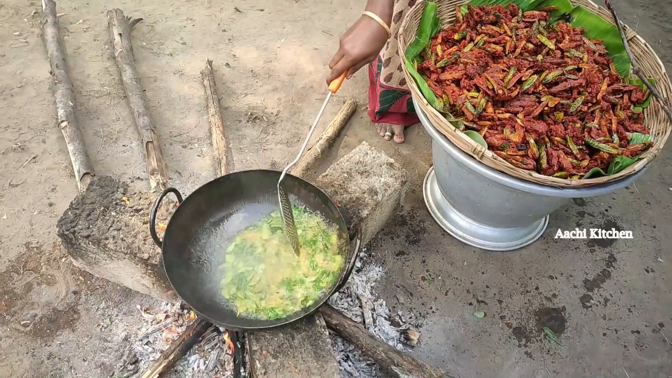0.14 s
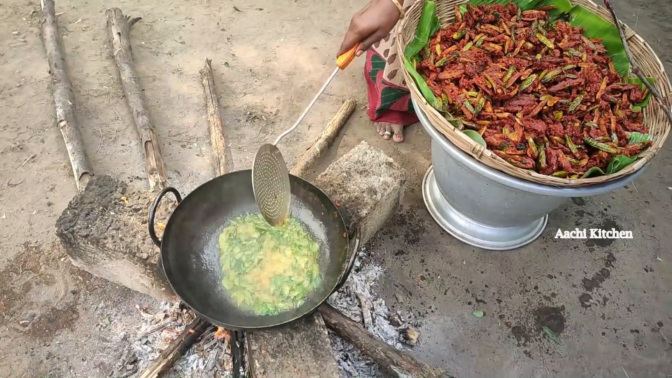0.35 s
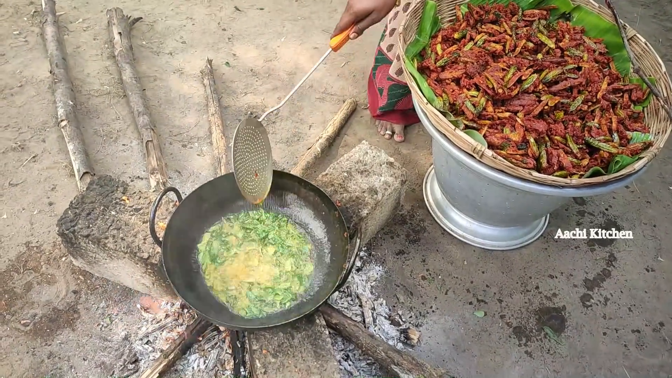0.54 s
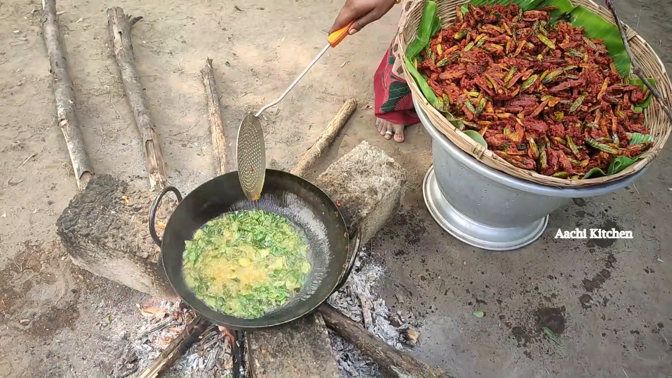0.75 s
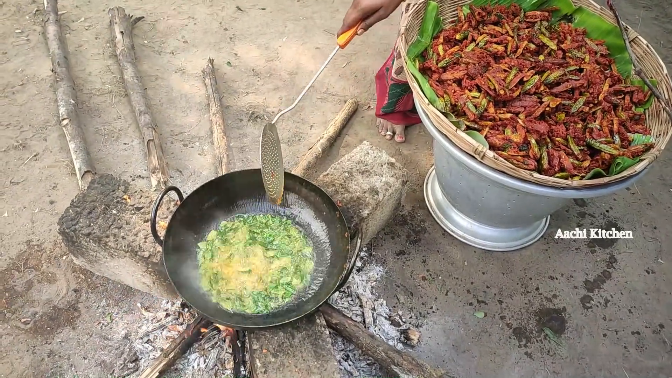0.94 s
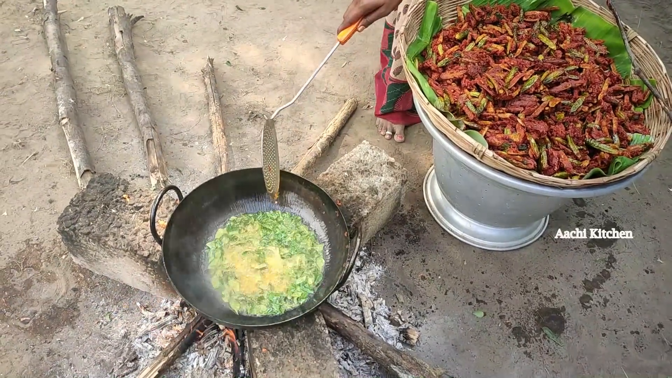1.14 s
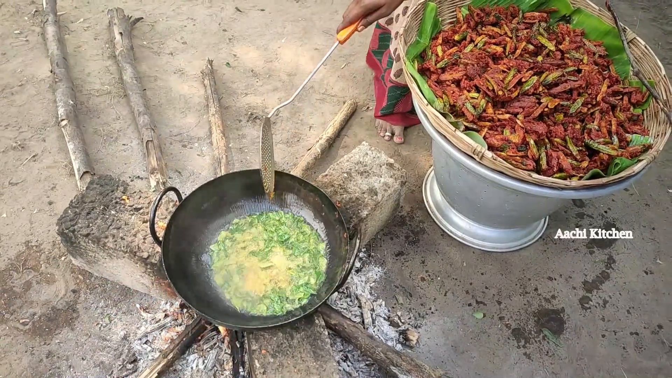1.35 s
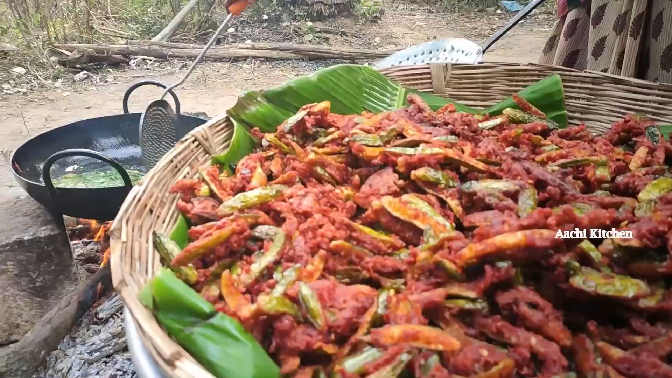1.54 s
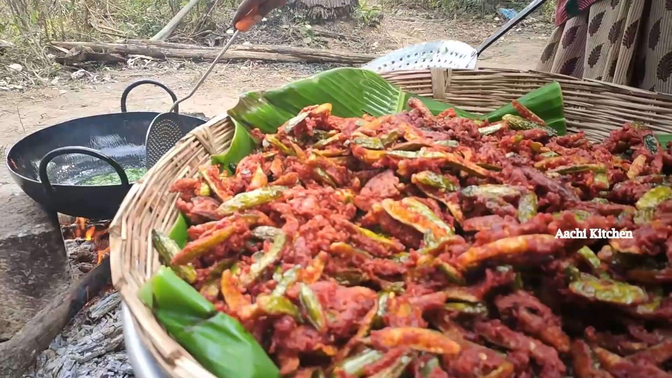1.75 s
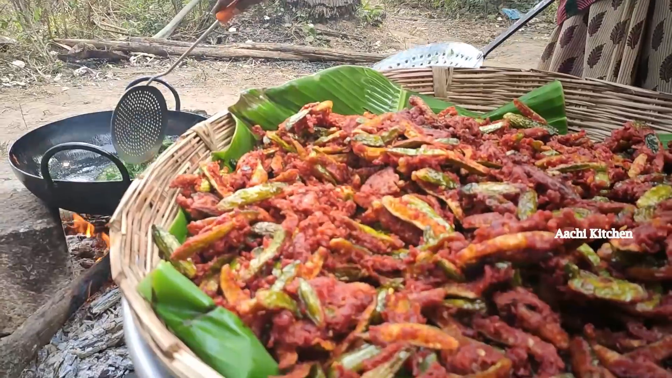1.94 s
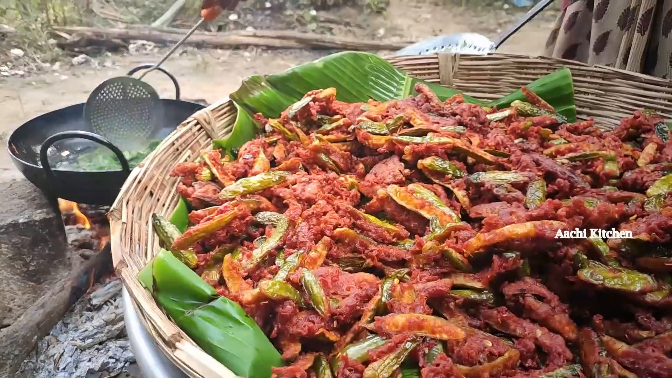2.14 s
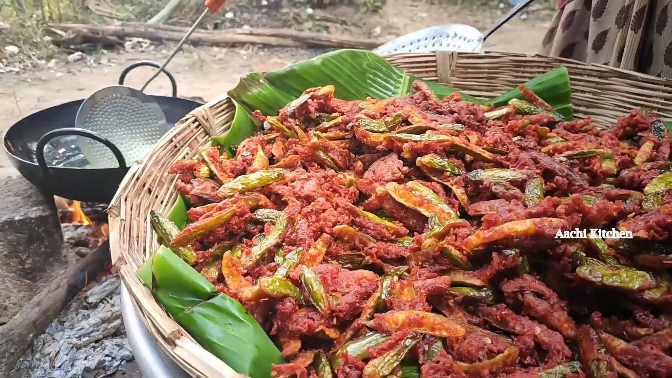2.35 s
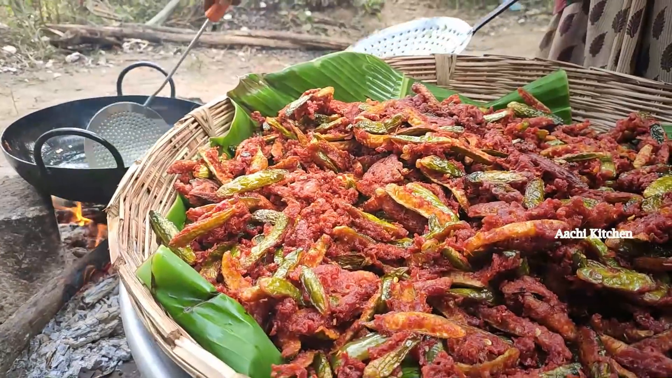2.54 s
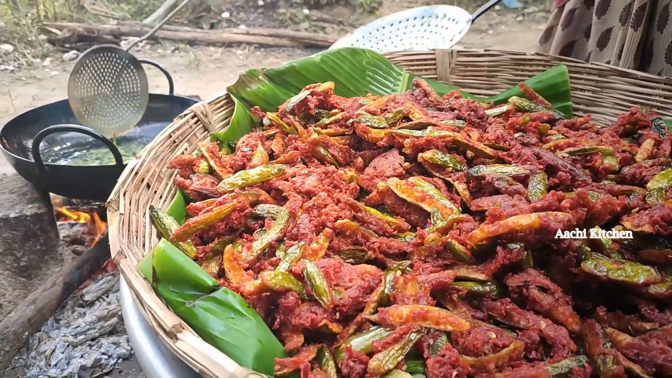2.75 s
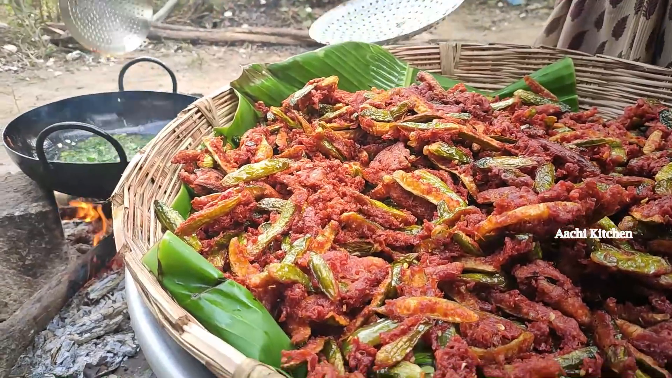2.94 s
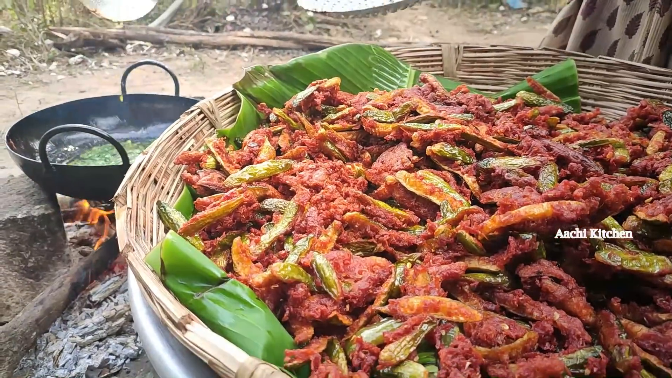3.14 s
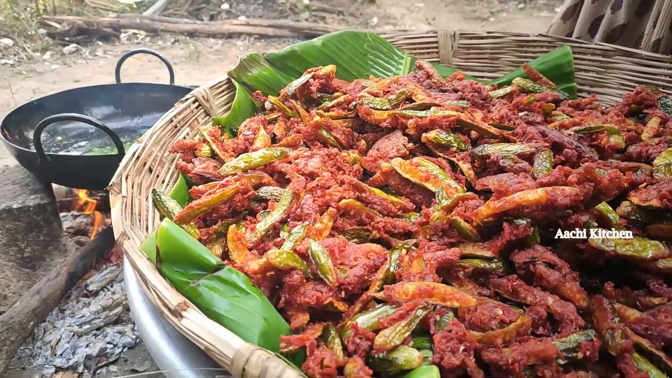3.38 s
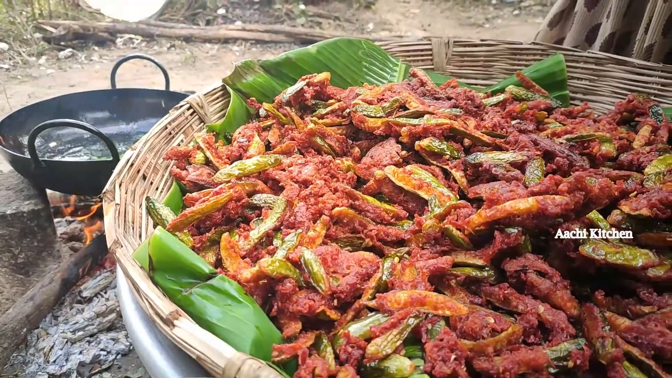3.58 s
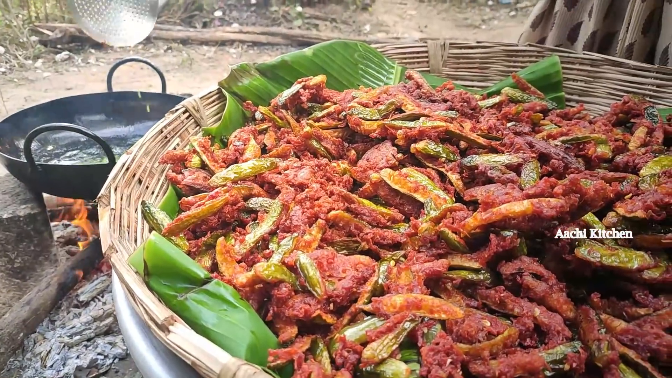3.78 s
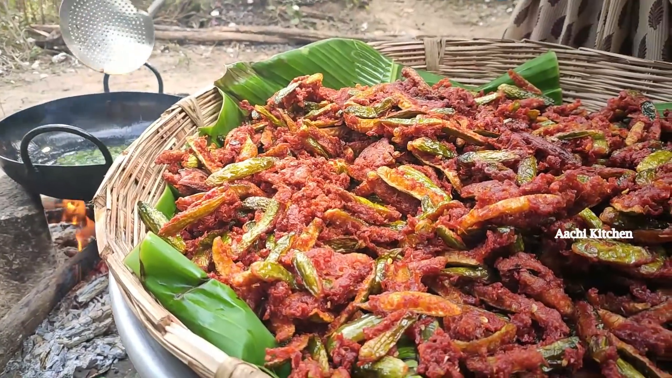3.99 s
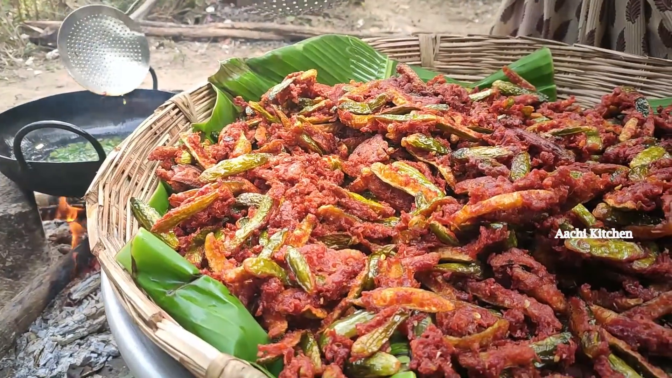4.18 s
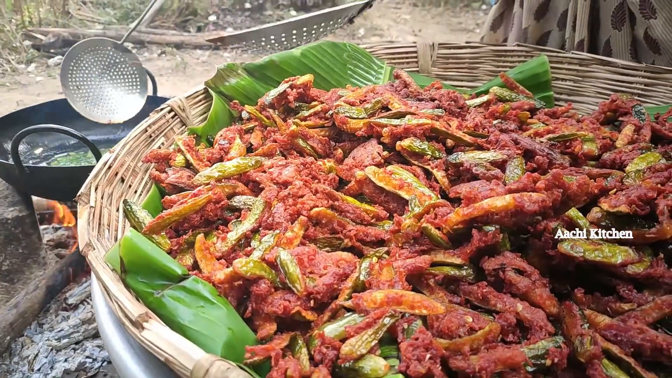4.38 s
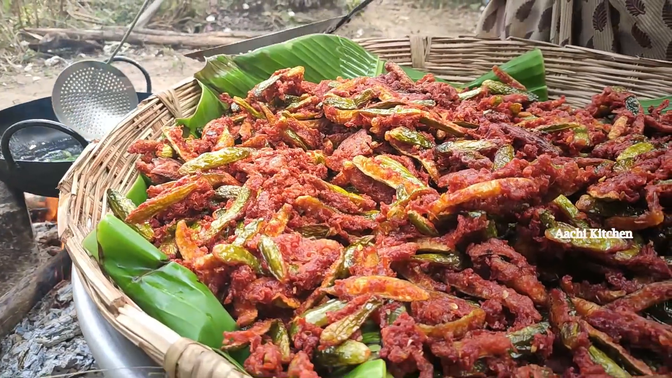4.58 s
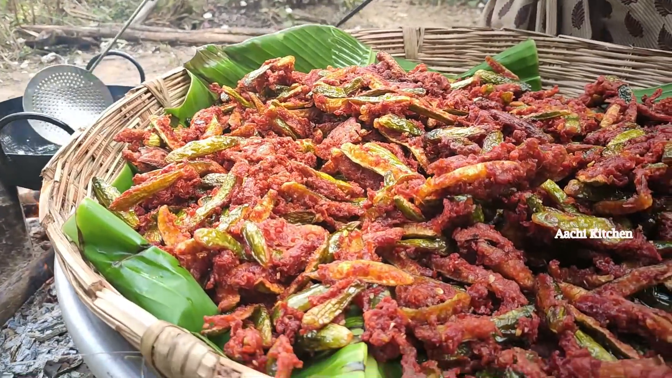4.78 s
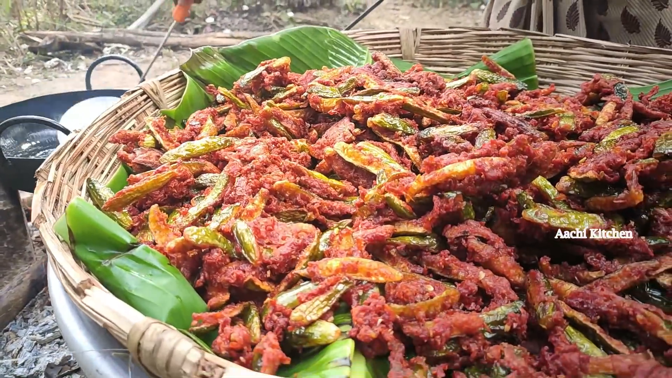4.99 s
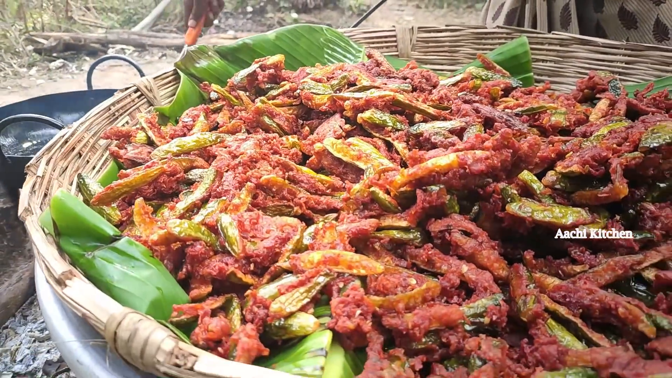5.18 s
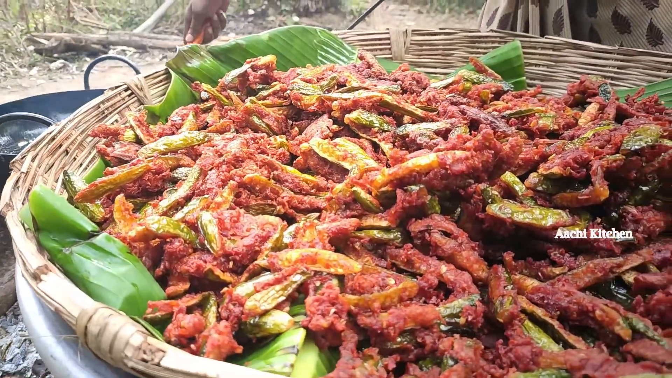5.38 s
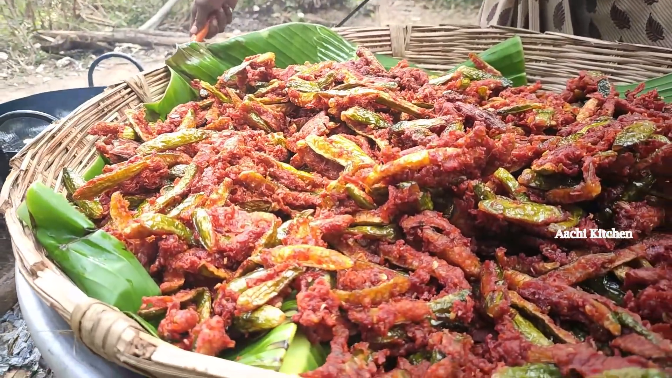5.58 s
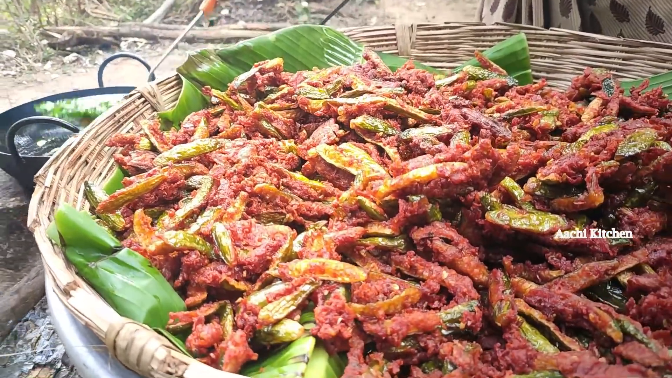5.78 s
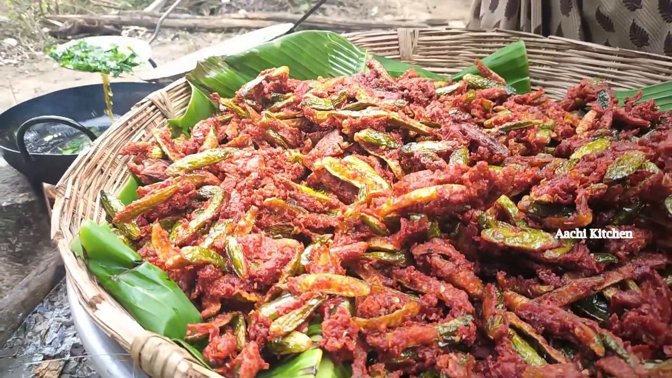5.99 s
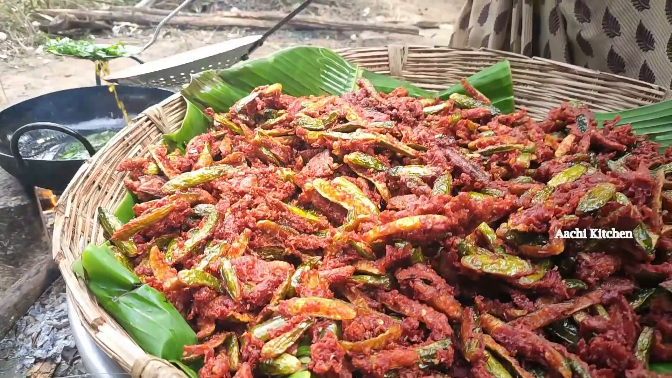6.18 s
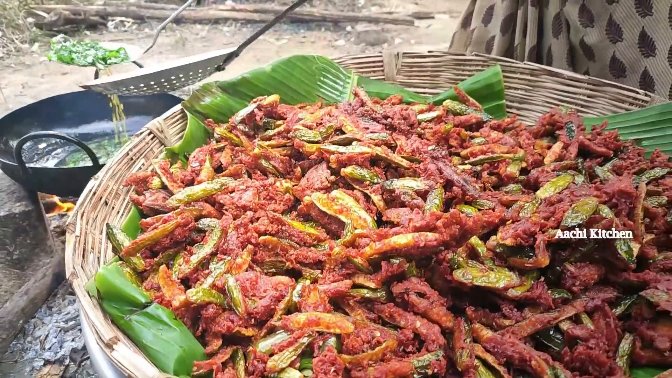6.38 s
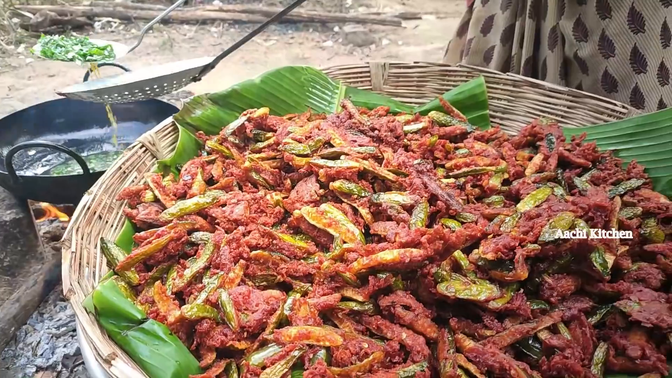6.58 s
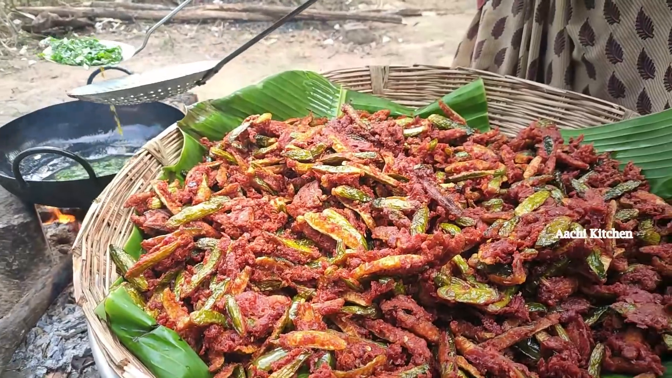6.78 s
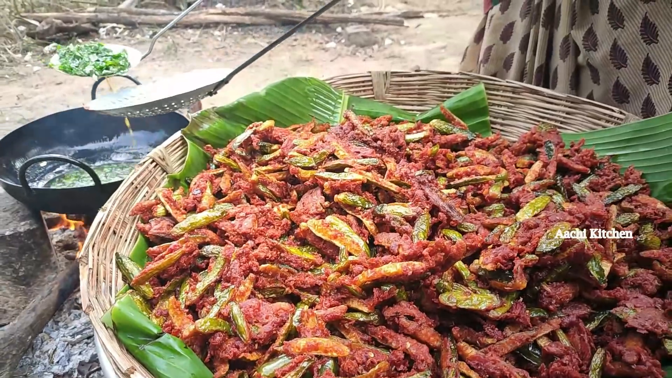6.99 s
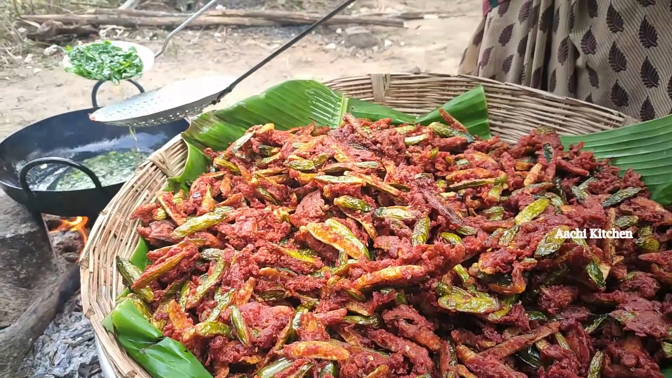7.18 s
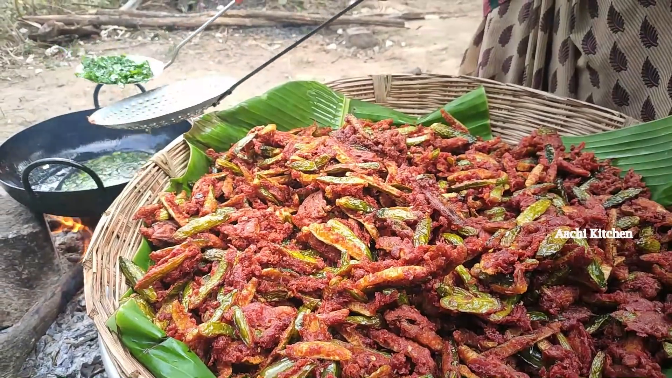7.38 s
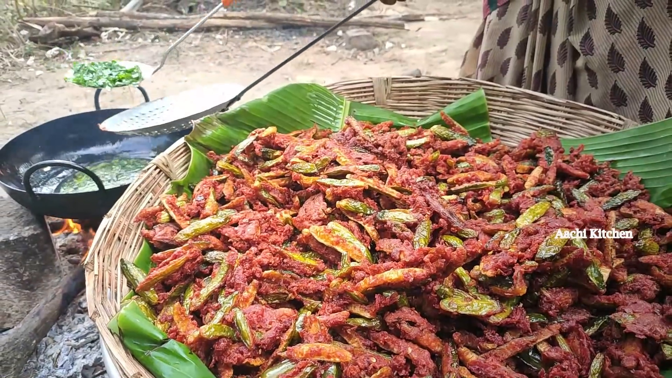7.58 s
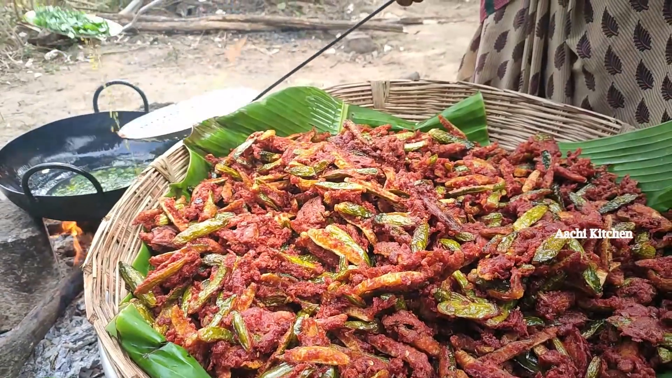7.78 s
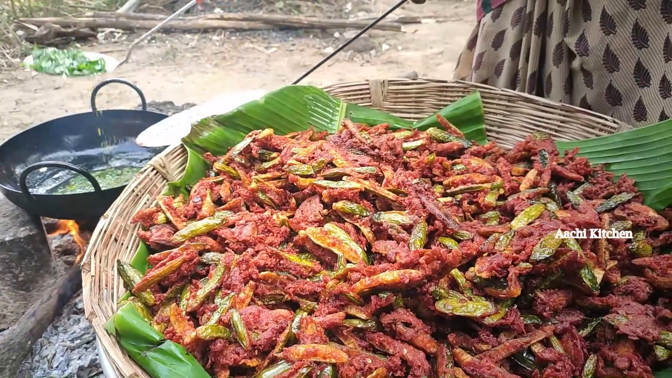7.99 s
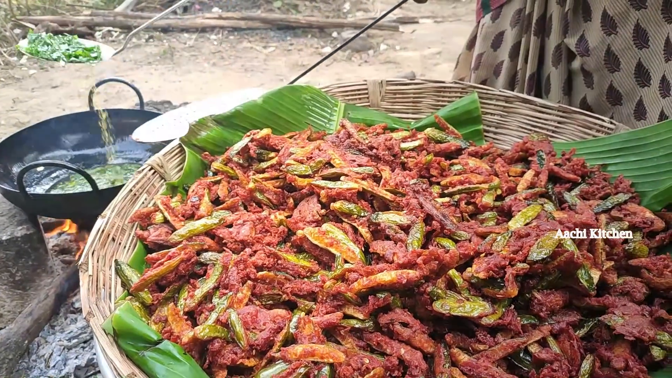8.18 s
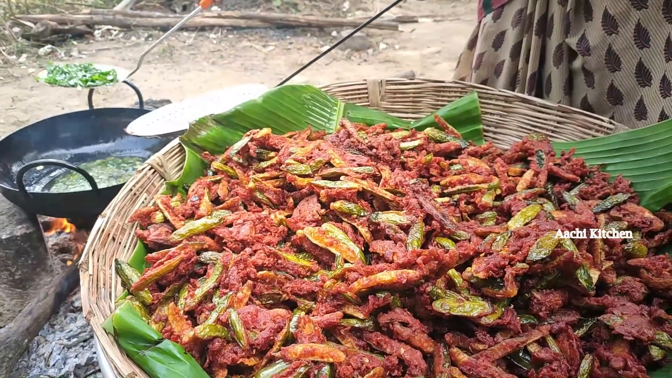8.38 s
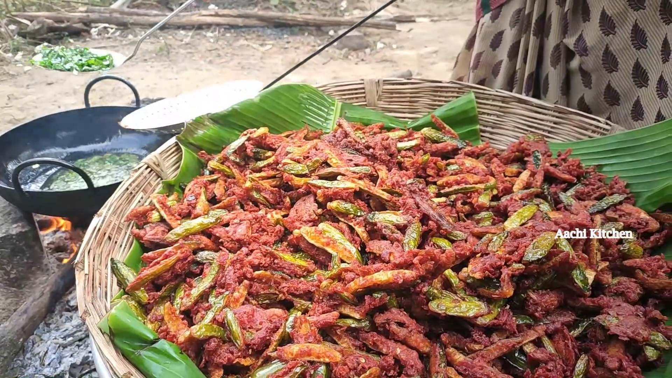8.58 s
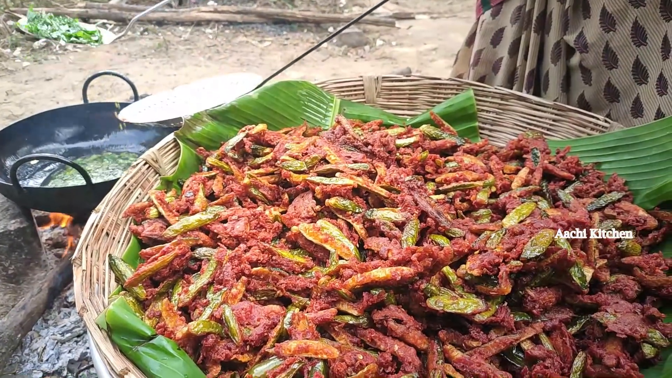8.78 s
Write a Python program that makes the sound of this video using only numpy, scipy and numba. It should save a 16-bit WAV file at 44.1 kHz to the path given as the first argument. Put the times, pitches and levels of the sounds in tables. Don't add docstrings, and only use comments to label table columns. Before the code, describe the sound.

From 0 to 1.5 s, wet leaves fry fiercely close to a phone's right microphone: dense, bright, loud hiss, with a hard metal knock at the start, piercing oil spits clustered near 0.05-0.4 s, low bubble pops around 0.55 and 0.9-1.2 s, dull pan bumps from 0.95 to 1.3 s and a last loud spit at 1.47 s. At 1.52 s it cuts to a more distant pan, far quieter, fizz thinner and leaning left. A clear clack lands at 1.76 s, then irregular ringing wet pops and crackles continue, with a strong snap at 5.2 s. From about 5.5 s drips from the lifted skimmer bring plinks and deeper bloops; sharp spits stand out near 8.0-8.1 s. Wind rumbles low throughout. After the cut a distant motorbike revs, fades, then idles faintly, clearer towards the end; a faint horn toots at 3.1 s.

```python
import sys
import numpy as np
from scipy import signal
from scipy.fft import rfft, irfft
from scipy.io import wavfile
from scipy.ndimage import uniform_filter1d, minimum_filter1d
from numba import njit

SR = 44100
rng = np.random.default_rng(int(sys.argv[2]) if len(sys.argv) > 2 else 0)


def natural_amplitude(level_db):
    exponent = np.asarray(level_db, float) / 20
    return 10 ** exponent


def store_wav(level_fs):
    pcm = np.round(np.clip(np.atleast_2d(level_fs), -1, 1) * 32767)
    wavfile.write(sys.argv[1], SR, pcm.T.astype(np.int16))


N = 389844

CUT_S = 1.524
USUAL_TOP_DB = -14.5
# (time [s], vigour [dB], extra fizz from wet leaves [dB])
BOIL_AFAR = [(1.52, -35, 5.6), (1.81, -36.5, 5.8), (2.4, -33, 8.4), (2.79, -36.5, 9.1), (3.37, -36.5, 6.3),
             (3.44, -32, 7.7), (3.52, -36, 6), (3.91, -37, 0.43), (5.07, -34, 0.46), (6.02, -40.5, 9.1),
             (6.39, -37, 6.2), (6.6, -39.5, 7.3), (7.64, -36.5, 1), (7.94, -36.5, 1.6), (8.39, -41.5, 0.44),
             (8.84, -34.5, 0.38)]


@njit
def ring(start, lag, hz, cycles, left, right, glide, size):
    out = np.zeros((2, size + 16384))
    for g in range(len(start)):
        tau = min(cycles[g] * SR / hz[g] / 3, 1500.)
        step = np.exp(-1 / tau + 2j * np.pi * hz[g] / SR)
        turn = np.exp(2j * np.pi * hz[g] / SR * glide / (5 * tau))
        z = np.sqrt(8 / tau) + 0j
        for n in range(int(7 * tau) + 2):
            swell = n / (n + tau / 3)
            out[0, start[g] + lag[g] + n] += left[g] * swell * z.imag
            out[1, start[g] + n] += right[g] * swell * z.imag
            z *= step
            step *= turn
    return out[:, :size]


def grains(s, hz, cycles, left_db, right_db, lag, glide=0.11):
    each = 0 * s
    start = np.clip(s * SR, 0, N - 1).astype(np.int64)
    late = np.clip(np.round(lag + each), 0, 64).astype(np.int64)
    left, right = natural_amplitude(left_db + each), natural_amplitude(right_db + each)
    return ring(start, late, np.clip(hz, 20, .4 * SR), cycles + each, left, right, glide, N)


def heard(ports, hz):
    f, left, right = np.transpose(ports)
    return np.interp(np.log(hz), np.log(f), left), np.interp(np.log(hz), np.log(f), right)


def walk(rate):
    hold = int(SR / rate)
    held = np.repeat(rng.standard_normal(N // hold + 1), hold)
    return 1.3 * uniform_filter1d(uniform_filter1d(held, hold), hold)[:N]


def sizzle(boil, ports, lag, spread, low_db, high_db, flicker_db, count, fizz_db, lean_db, drift_db):
    simmer_db, fade_db_per_s, simmer_top_hz = 1, -0.87, 1326
    t, vigour, wet = np.transpose(boil)
    lasts_s = t[-1] - t[0]
    u = rng.random((count, 4)).T
    s, hz = t[0] + lasts_s * u[0], 200 + 17200 * u[1]
    small = np.clip(np.log2(hz / 2800) / 2.03, 0, 1)

    swell = np.interp(s, t, vigour - vigour.mean()) + small * (fizz_db + np.interp(s, t, wet))
    at = (s * SR).astype(int).clip(0, N - 1)
    swell = swell + 0.73 * walk(9)[at]
    swell = swell + flicker_db * (0.55 * (1 - small) * walk(60)[at] + small * walk(45)[at])
    swell = swell + (s > CUT_S) * (hz < simmer_top_hz) * (simmer_db + fade_db_per_s * (s - CUT_S))

    scatter = low_db + (high_db - low_db) * small
    size = np.minimum(-np.log(u[2] + 1e-9), 6) * scatter
    size = size - 10 * np.log10(1 / (1 - np.minimum(scatter * np.log(10) / 10, .9)))
    share = 10 * np.log10(17200 * SR * lasts_s / count)
    level = swell + size + share

    left, right = heard(ports, hz)
    lean = small * (lean_db + drift_db * (s - t[0])) / 2
    place = rng.standard_normal(count)
    cycles = 4.75 + 18.5 * u[3] ** 2
    return grains(s, hz, cycles, left + lean + level, right - lean + level, lag + spread * place)


def pops(events, lag, cycles, gain_db):
    s, db, hz, pan = np.transpose(events)
    u = rng.random((len(s), 5)).T
    turns = cycles * (0.41 + .5 * u[0])
    db = db + gain_db + 10 * np.log10(turns * SR / hz)
    left, right = db + np.minimum(pan, 0), db - np.maximum(pan, 0)
    main = grains(s, hz, turns, left, right, lag, glide=0.017)
    tick = grains(s, 2.35 * hz, 5.4, left - 15, right - 15, lag)
    beside = grains(s + 0.0056 * u[1], hz * (1.1 + .5 * u[2]), turns, left - 9, right - 9, lag)
    hollow = grains(s, hz * (0.552 + 0.37 * u[2]), turns / 2, left - 12, right - 12, lag)
    shed_s = s + .006 + .012 * u[3]
    shed = grains(shed_s, hz * (0.792 + .5 * u[4]), turns, left - 10, right - 10, lag)
    return main + tick + hollow + beside + shed


def spits(events, ports, lag, gain_db, burst_s, tail_s, tail_db, count=160):
    lull_s = .009
    echo_s, echo_db = 0.0022, -1
    s, db, top_db, pan = (np.repeat(c, count) for c in np.transpose(events))
    u = rng.random((len(s), 4)).T
    late = u[0] < .7
    echoed = u[0] > .86
    after = -np.log(u[1] + 1e-9) * np.where(late, tail_s, burst_s)
    after = after + late * lull_s * (.6 + u[3]) + echoed * echo_s

    hz = 1500 + 14500 * u[2]
    colour = np.max(heard(ports, hz), axis=0) - np.max(heard(ports, 9420.0))
    colour = colour + (top_db - USUAL_TOP_DB) * np.clip(np.log2(hz / 9500) / 0.36, 0, 1)
    colour = colour + 4.0 * ~late * np.clip(np.log2(hz / 9000), 0, 1)
    colour = colour - 20 * np.clip(np.log2(7400 / hz), 0, 1.2)
    db = db + gain_db + colour + tail_db * late + echo_db * echoed
    left, right = db + np.minimum(pan, 0), db - np.maximum(pan, 0)
    return grains(s + after, hz, 5.3, left, right, lag + 8 * (u[3] - .5))


def ticks(count, base_db):
    u = rng.random((count, 3)).T
    db = base_db + 4 * np.minimum(-np.log(u[1]), 2.5)
    return grains(CUT_S * u[0], 1500 + 8500 * u[2], 1.1, db - 22, db, 12)


def cancel(x, dips):
    f = np.arange(N // 2 + 1) * SR / N
    loss_db = sum(db * np.exp(-((f - hz) / width) ** 2) for hz, width, db in dips)
    return irfft(rfft(x) * natural_amplitude(loss_db), N)


def sliding_cancel(x, dips):
    wander = .025
    place = np.clip(walk(40), -1, 1)
    out = 0
    for k in (-1, 0, 1):
        shifted = [(hz * (1 + k * wander), width, db) for hz, width, db in dips]
        out = out + np.clip(1 - abs(place - k), 0, 1) * cancel(x, shifted)
    return out


def near_pan():
    # (time [s], vigour [dB], extra fizz from wet leaves [dB])
    boil_close = [(0.0, -24.5, 8.5), (0.326, -24, 5), (0.372, -24.5, 4.5), (0.7, -23.5, 3), (1.022, -22, 5),
                  (1.026, -24.5, 5), (1.36, -27, 5), (1.4, -26.5, 1.5), (1.524, -24, 1.5)]
    # (frequency [Hz], left [dB per Hz], right [dB per Hz])
    ports_close = [(200, -83, -66), (328, -74.5, -80), (539, -59.5, -53.5), (910, -60, -57),
                   (1740, -69.5, -52.5), (2500, -62.5, -58.5), (3770, -148, -54.5), (6800, -131, -57),
                   (10800, -141, -56.5), (14900, -120, -58.5), (16800, -103, -65)]
    # (frequency [Hz], width [Hz], level [dB])
    dips_close = [(2700, 200, -7), (5650, 400, -12), (11250, 400, -7), (14500, 250, -4)]
    # (time [s], peak [dB], frequency [Hz], left minus right [dB])
    pops_close = [
        (0.042, -15, 627, -18),
        (0.56, -9, 830, 3),
        (0.873, -15, 610, -5),
        (0.912, -8, 740, -6),
        (1.016, -7.5, 610, -15),
        (1.207, -9.5, 825, -20),
        (1.236, -13, 690, -16),
    ]
    # (time [s], peak [dB], frequency [Hz], left minus right [dB])
    knocks = [
        (0.037, -5.5, 269, -21),
        (0.751, -44, 393, -5),
        (0.961, -15, 154, -15),
        (1.102, -25, 248, -3),
        (1.203, -12.5, 121, -21),
        (1.24, -12, 190, -20),
        (1.301, -13, 366, -13),
        (1.358, -37, 396, -10.5),
    ]
    # (time [s], peak [dB], left minus right [dB])
    spits_close = [
        (0.0447, -7, -45),
        (0.068, -14, -47),
        (0.1165, -6, -50),
        (0.2624, -3, -54),
        (0.287, -2, -52),
        (0.3028, -5, -44),
        (0.3114, -3, -54),
        (0.4252, -12, -57),
        (1.3628, -28, -39),
        (1.47, -4.5, -62),
    ]
    x = sizzle(boil_close, ports_close, lag=12.9, spread=1.5, low_db=2.0, high_db=2.0, flicker_db=1.5,
               count=45000, fizz_db=-6.0, lean_db=-5.5, drift_db=-0.5)
    x = x + pops(pops_close, 8.8, 4.4, -11.0) + pops(knocks, 17, 2.6, -17.5)
    with_treble = np.insert(spits_close, 2, USUAL_TOP_DB, axis=1)
    x = x + spits(with_treble, ports_close, 12, 1.5, .0006, .004, -16)
    x = x + ticks(count=220, base_db=-8)
    return np.array([x[0], sliding_cancel(x[1], dips_close)])


def wind():
    near_db, far_db, gusty_db = -41, -37, 0.5
    # (frequency [Hz], level [dB per Hz])
    rumble = [(7.1, -27), (12, 2.5), (45, 2), (155, -17), (212, -23), (303, -22.5), (421, -37.5),
              (500, -35), (650, -49), (1100, -120)]
    f = np.maximum(np.arange(N // 2 + 1) * SR / N, 1)
    hz, db = np.transpose(rumble)
    colour = natural_amplitude(np.interp(np.log(f), np.log(hz), db, left=-60, right=-80))
    shared, left, right = (irfft(rfft(rng.standard_normal(N)) * colour, N) for _ in range(3))
    x = np.array([np.roll(shared, 18) + 0.39 * left, shared + 0.091 * right])
    gust = np.where(np.arange(N) < CUT_S * SR, near_db, far_db) + gusty_db * walk(2.71)
    return x / x.std() * natural_amplitude(gust + 0.2 * walk(8.8))


def placed(events, pan_db, drift_db, spread_db):
    rows = np.array(events)
    pan = pan_db + drift_db * (rows[:, 0] - CUT_S) + spread_db * rng.standard_normal(len(rows))
    return np.column_stack([rows, pan])


def small_pops(count):
    u, g = rng.random((count, 2)).T, rng.standard_normal((count, 2)).T
    s = CUT_S + (N / SR - CUT_S) * u[0]
    size = np.minimum(-np.log(u[1]), 2.5)
    return np.transpose([s, -34 + 3.35 * size, 2300 * 2 ** (0.278 * g[0]), 4.9 + 14.0 * g[1]])


def small_spits(count):
    u = rng.random((count, 2)).T
    s = CUT_S + (N / SR - CUT_S) * u[0]
    t, vigour, _ = np.transpose(BOIL_AFAR)
    size = 5 * np.minimum(-np.log(u[1]), 2)
    lively = np.interp(s, t, vigour - vigour.mean())
    return np.transpose([s, -36 + size + lively, USUAL_TOP_DB + 0 * s])


def thump():
    db = np.array([-2.0, -10.0])
    return grains(np.array([1.762, 1.764]), np.array([500., 560.]), 8.2, db, db, 10, glide=0.)


def far_pan():
    mid_db, top_db, drift_db_per_s = 9.5, 1.5, 1.47
    # (frequency [Hz], left [dB per Hz], right [dB per Hz])
    ports_afar = [(200, -103, -105), (434, -82.5, -82), (780, -82, -79.5), (1100, -63.5, -66.5),
                  (1800, -67.5, -72.5), (2500, -70.5, -71), (3660, -72.5, -70), (5500, -74, -82.5),
                  (8070, -72.5, -78), (9700, -77.5, -95), (10540, -73.5, -86.5), (15000, -86, -85)]
    # (frequency [Hz], width [Hz], level [dB])
    dips_afar = [(1500, 150, -5), (3650, 300, -4), (6350, 300, -4)]
    # (time [s], peak [dB], frequency [Hz])
    leaf_pops = [(1.606, -24.5, 2370), (1.676, -24.5, 2490), (1.7429, -31, 1900), (1.7638, -24, 1830),
                 (1.8112, -33, 2340), (1.944, -24.5, 1750), (1.9723, -26, 2444), (2.0168, -28, 1720),
                 (2.058, -28, 2580), (2.0904, -22.5, 2380), (2.2118, -36, 2430), (2.2283, -30, 2500),
                 (2.2776, -26, 2380), (2.3214, -27, 2380), (2.336, -25.5, 1900), (2.4409, -26, 2300),
                 (2.5555, -26.5, 2300), (2.591, -34, 2250), (2.6297, -28, 2400), (2.7287, -26, 2200),
                 (2.8644, -30, 1860), (2.8867, -28, 2370), (2.931, -29.5, 2230), (3.1282, -28.5, 1930),
                 (3.2355, -25, 2430), (3.3428, -19.5, 2350), (3.382, -35, 2510), (3.4001, -35, 2110),
                 (3.414, -26, 2480), (3.4555, -28, 2380), (3.5064, -31, 1850), (3.5732, -27, 2270),
                 (3.686, -27, 2250), (3.7219, -36, 2408), (3.8371, -34, 2350), (3.8685, -31, 1950),
                 (3.9343, -30, 1950), (3.9559, -30, 1880), (4.0992, -35, 2280), (4.1447, -28, 2270),
                 (4.2385, -31, 2380), (4.252, -25.5, 2400), (4.3475, -26.5, 1920), (4.4657, -27.5, 1820),
                 (4.4846, -33, 2900), (4.6176, -29, 2800), (4.6498, -24, 1828), (4.6982, -26, 3220),
                 (4.7066, -27, 2420), (4.7346, -30, 2320), (4.8069, -33, 2370), (4.8243, -24.5, 2240),
                 (4.8633, -24.5, 2280), (5.1048, -24, 2960), (5.1452, -21.5, 2330), (5.2125, -23.5, 2880),
                 (5.3443, -21, 2370), (5.3627, -26, 2380), (5.423, -32, 2770), (5.444, -27.5, 1770)]
    # (time [s], peak [dB], frequency [Hz])
    later_pops = [(5.476, -33, 1930), (5.4927, -28, 1910), (5.6379, -30, 2320), (5.639, -23.5, 1900),
                  (5.706, -23.5, 1870), (5.805, -24, 2030), (5.8624, -28.5, 2560), (5.884, -28, 2520),
                  (5.9753, -37, 2600), (6.199, -29, 2210), (6.3045, -25.5, 2820), (6.3338, -34, 2760),
                  (6.3872, -26, 2090), (6.488, -29.5, 1730), (6.5269, -35, 3120), (6.544, -26, 2710),
                  (6.566, -37, 2530), (6.583, -19.5, 2680), (6.7267, -24.5, 2580), (6.787, -28, 2010),
                  (6.881, -27.5, 2610), (6.9173, -30, 2170), (7.055, -38, 2740), (7.0682, -27, 2510),
                  (7.11, -31.5, 2570), (7.221, -26, 2170), (7.26, -28, 2410), (7.2952, -23, 2130),
                  (7.356, -27, 2640), (7.366, -24, 2110), (7.399, -31, 2560), (7.537, -34, 2660),
                  (7.6544, -27.5, 2190), (7.6622, -22, 2790), (7.7605, -37, 2100), (7.785, -26, 2150),
                  (7.805, -22, 2030), (7.8469, -24.5, 2590), (7.872, -26.5, 2560), (7.8903, -27, 2580),
                  (7.9274, -27, 2090), (7.9585, -19.5, 2120), (7.9771, -22.5, 2530), (7.997, -25.5, 2140),
                  (8.0268, -31, 2160), (8.099, -26.5, 2500), (8.181, -35, 2890), (8.22, -29, 2560),
                  (8.252, -35, 2120), (8.333, -37, 2530), (8.373, -26, 2000), (8.412, -29, 2770),
                  (8.449, -34, 2270), (8.468, -23.5, 2060), (8.571, -26.5, 2640), (8.5902, -21.5, 2140),
                  (8.625, -23, 2140), (8.6782, -26.5, 2040), (8.7189, -31, 2730), (8.7709, -24.5, 2160)]
    # (time [s], peak [dB], frequency [Hz])
    deep_pops = [(1.945, -31, 1330), (2.015, -32, 1080), (2.168, -29.5, 1370), (2.21, -38, 1075),
                 (2.234, -31, 1100), (2.483, -32, 1050), (2.628, -33, 965), (3.095, -38, 910),
                 (3.129, -34, 950), (3.18, -33, 1050), (3.253, -31, 1080), (3.383, -31.5, 1060),
                 (3.504, -35, 1100), (3.573, -33.5, 1100), (3.747, -27.5, 1100), (3.868, -41, 1050),
                 (3.933, -40, 1130), (3.956, -31.5, 960), (4.411, -33.5, 1040), (4.445, -39, 1113),
                 (4.466, -30, 1120), (4.527, -34, 1060), (4.648, -32, 1000), (4.706, -39, 1080),
                 (4.771, -31, 920), (4.826, -33, 937), (4.993, -35, 1060), (5.082, -40, 1110),
                 (5.3, -37, 1060), (5.336, -35, 1050), (5.516, -39, 1150), (5.557, -32, 1370),
                 (5.572, -25, 1240), (5.639, -21.5, 1550), (5.707, -24, 1590), (5.867, -28, 1410),
                 (5.913, -39, 1130), (6.229, -35, 1090), (6.247, -20.5, 1250), (6.326, -39, 1140),
                 (6.386, -28, 1320), (6.487, -30, 1610), (6.565, -35, 1340), (6.755, -36, 1450),
                 (6.785, -31.5, 1450), (6.882, -30.5, 1630), (7.464, -33, 1520), (7.479, -24.5, 1265),
                 (7.759, -34, 1150), (7.808, -24, 1430), (7.928, -25, 1630), (8.026, -33, 1320),
                 (8.209, -28, 1460), (8.253, -36, 1150), (8.332, -40, 1300), (8.449, -35.5, 1540),
                 (8.473, -23, 1500), (8.593, -31.5, 1140), (8.686, -31, 1150), (8.772, -40, 1150)]
    # (time [s], peak [dB], frequency [Hz], left minus right [dB])
    clacks = [
        (1.7635, -18, 1800, 19),
        (5.105, -31, 2980, -1),
        (8.57, -35, 2130, 1.0),
    ]
    # (time [s], peak [dB], treble share [dB])
    spits_afar = [(1.5393, -22, -7), (1.7092, -19.5, -10.5), (1.7369, -23, -13), (1.7662, -19.5, -9),
                  (1.8356, -20.5, -11), (2.0154, -17.5, -15), (2.0901, -14.5, -13), (2.1644, -20.5, -7),
                  (2.2378, -25, -9), (2.2536, -18, -8), (2.4165, -23, -10), (2.438, -20, -16),
                  (2.5192, -19, -9), (2.6085, -16, -14), (2.6545, -18.5, -19), (2.7052, -22, -10),
                  (2.754, -20.5, -8), (2.8846, -20.5, -3), (3.0695, -20.5, -7), (3.2215, -24, -15),
                  (3.252, -20.5, -16), (3.294, -29, -5), (3.4101, -18.5, -15), (3.4655, -17, -14),
                  (3.5169, -17, -7.5), (3.5745, -22, -14), (3.5954, -24, -16), (3.64, -19, -14),
                  (3.7105, -20.5, -10), (3.7416, -18, -15.5), (4.073, -21.5, -10), (4.1494, -24, -16),
                  (4.1903, -22, -17), (4.4753, -19.5, -19), (4.635, -21.5, -11), (4.675, -22, -10),
                  (4.7046, -10, -18), (4.8179, -29, -18), (4.957, -17.5, -11), (4.995, -13, -17)]
    # (time [s], peak [dB], treble share [dB])
    lift_spits = [(5.1073, -20, -11), (5.204, -23, -15), (5.213, -6.5, -15.5), (5.296, -21, -10),
                  (5.3635, -28, -7), (5.4217, -16, -15), (5.521, -14, -18), (5.629, -23, -13),
                  (5.648, -20, -15), (5.7157, -24, -12), (5.7504, -20.5, -19), (5.77, -19, -20),
                  (5.7911, -24, -14), (5.8113, -18, -23), (5.852, -20, -12), (6.074, -23.5, -16),
                  (6.1826, -17, -19), (6.2433, -19.5, -9), (6.2784, -17, -13), (6.3347, -19.5, -17),
                  (6.385, -18, -15), (6.4157, -17, -14), (6.477, -14.5, -17), (6.613, -18, -20),
                  (6.7728, -20.5, -17), (6.903, -23, -7), (6.9809, -31, -7), (7.0014, -22.5, -2),
                  (7.093, -23, -16), (7.1476, -28, -1), (7.1975, -35, -12), (7.221, -23, -15),
                  (7.286, -25, -13), (7.3063, -18, -11), (7.4964, -26, -11), (7.5656, -25, -12),
                  (7.626, -21, -6), (7.656, -16, -14), (7.7467, -29, -15), (7.7806, -21, -16),
                  (7.8608, -15.5, -17), (7.8783, -17.5, -13), (8.0259, -12.5, -10), (8.075, -20.5, -4),
                  (8.0998, -9.5, -8.5), (8.424, -27, -14), (8.4835, -27.5, -12), (8.718, -37, -15),
                  (8.739, -20.5, -14.5), (8.786, -20, -15)]
    x = sizzle(BOIL_AFAR, ports_afar, lag=15.3, spread=3.5, low_db=2.5, high_db=1.0, flicker_db=2.5,
               count=90000, fizz_db=-1.5, lean_db=-7.5, drift_db=drift_db_per_s)
    x = cancel(x, dips_afar)
    x = x + pops(placed(np.vstack([leaf_pops, later_pops]), mid_db, 0, 21.0), 19.0, 16.3, 0.16)
    x = x + pops(placed(deep_pops, mid_db, 0.9, 26.0), 9.8, 14.0, 0.39) + thump()
    x = x + pops(clacks, 23.0, 1.6, 0.5) + pops(small_pops(count=300), 20.3, 26.4, -9.0)
    strong = placed(np.vstack([spits_afar, lift_spits]), top_db, drift_db_per_s, 3.2)
    x = x + spits(strong, ports_afar, 17, 2.46, 0.0006, 0.011, -8.0, count=180)
    faint = placed(small_spits(count=250), top_db, drift_db_per_s, 1.2)
    return x + spits(faint, ports_afar, 13, 1.13, 0.0011, 0.0066, 5.0, count=50)


def motorbike():
    rev_hz, idle_hz, rev_ends_s = 23.8, 19.02, 2.3
    hunt_s, hunt_length_s, hunt_hz = 4.2, 2.05, .55
    # (time [s], level [dB])
    cover = [(1.52, -44.5), (2.06, -44.5), (2.2, -77), (3.0, -50.5), (3.45, -48.5), (3.7, -55),
             (5.5, -50.5), (6.6, -65), (7.5, -45.5), (8.84, -44)]
    # (frequency [Hz], level [dB], ringing [cycles])
    exhaust = [(119, -22, 3.3), (196.4, 6, 3.17), (251, -1, 6), (357, -10.5, 12)]
    t, db = np.transpose(cover)
    now = np.arange(int(CUT_S * SR), N) / SR
    idle = idle_hz * now + .85 + hunt_hz * np.clip(now - hunt_s, 0, hunt_length_s)
    turns = np.where(now < rev_ends_s, rev_hz * now + .45, idle)
    s = now[1:][np.diff(np.floor(turns)) > 0]
    uneven = rng.standard_normal((len(s), 2)).T
    s = s + .0003 * uneven[0]
    level = np.interp(s, t, db) + 1.0 * uneven[1] + 27.0
    return sum(grains(s, hz + 0 * s, cycles, level + mode_db, level + mode_db, 3.3, glide=-0.014)
               for hz, mode_db, cycles in exhaust)


def horn():
    start_s, length_s, edge_s = 3.12, 0.28, 0.017
    now = np.arange(N) / SR
    phase = 2 * np.pi * np.cumsum(358 * (1 + .006 * walk(26.0))) / SR
    blow = np.clip(np.minimum(now - start_s, start_s + length_s - now) / edge_s, 0, 1)
    level = np.sqrt(2) * natural_amplitude(-53 + 2.0 * walk(30.1))
    octave = natural_amplitude(-9.5 + 4 * walk(31.3)) * np.sin(2 * phase)
    return level * blow * (np.sin(phase) + octave)


def drop_weak_bands(x):
    patchy_db, open_crest, loud_db = 4.5, 6.5, -4
    # (frequency [Hz], threshold [dB])
    thresholds = [(900, -20), (1500, -8), (2500, -9), (3600, 0), (5000, -2.5), (6300, -2.5), (8000, -6),
                  (11000, -5), (13000, -3.5), (15500, 2)]
    window = np.sin(np.pi * (np.arange(2048) + .5) / 2048)
    f, t, z = signal.stft(x, SR, window, 2048, 1024)

    def pair(bands):
        both = np.array([bands[0] + bands[1], bands[0] - bands[1]]) / np.sqrt(2)
        return np.where(t > CUT_S, both, bands)

    def wide(p):
        return uniform_filter1d(uniform_filter1d(p, 120, axis=1), 3, axis=2) + 1e-18

    z = pair(z)
    power = abs(z) ** 2
    patch = np.repeat(rng.standard_normal((len(f) // 12 + 1, len(t))), 12, axis=0)[:len(f)]
    patch = sum(np.roll(patch, k, axis=1) for k in range(3)) / np.sqrt(3)
    hz, db = np.transpose(thresholds)
    bar = np.interp(f, hz, db, left=-60)[:, None] + patchy_db * patch
    bar = np.array([bar, bar + loud_db * (t < CUT_S)])

    edge = abs(np.diff(x, axis=1)).sum(axis=0)
    crest = -minimum_filter1d(-edge, 1400) / np.sqrt(uniform_filter1d(edge ** 2, 2048) + 1e-18)
    crack = crest[np.minimum(t * SR, N - 2).astype(int)] > open_crest
    kept = (power > wide(power) * natural_amplitude(2 * bar)) | crack
    makeup = np.minimum(wide(power) / wide(power * kept), 2)
    return signal.istft(pair(z * kept * np.sqrt(makeup)), SR, window, 2048, 1024)[1][:, :N]


def scene():
    before = np.clip((CUT_S - np.arange(N) / SR) / .003, 0, 1)
    return before * near_pan() + wind() + far_pan() + motorbike() + horn()


def top_cut(x):
    return signal.sosfilt(signal.butter(12, 16860, fs=SR, output="sos"), x)


def record(dry):
    low_pass = signal.ellip(10, .3, 60, 15750, fs=SR, output="sos")
    x = signal.sosfilt(low_pass, np.clip(dry, -1, 1))
    return top_cut(drop_weak_bands(x))


dry = scene()
out = record(dry)
store_wav(out)
```